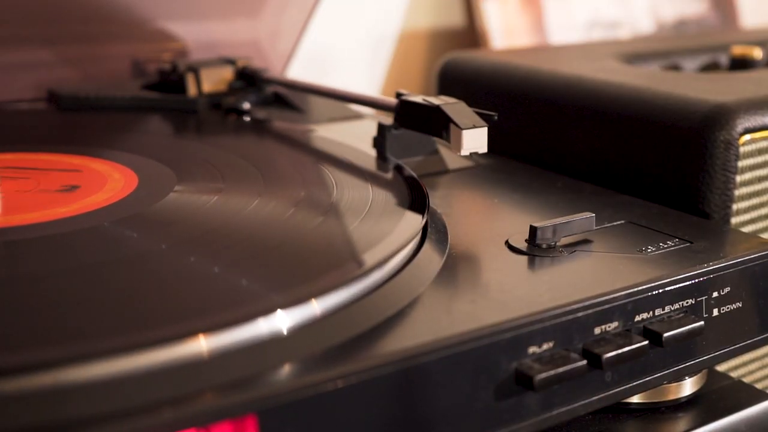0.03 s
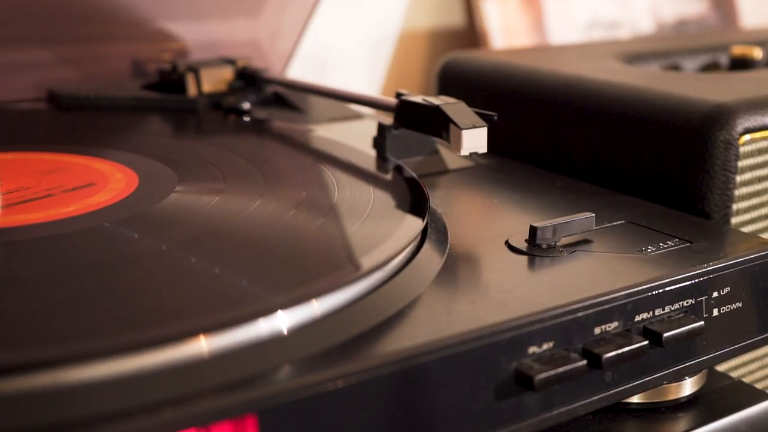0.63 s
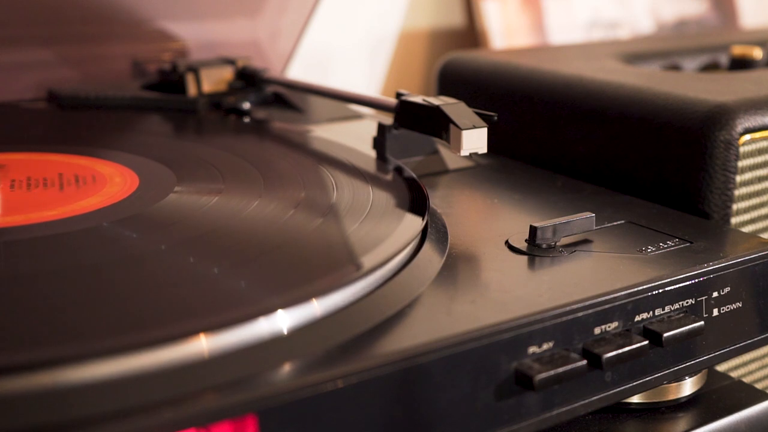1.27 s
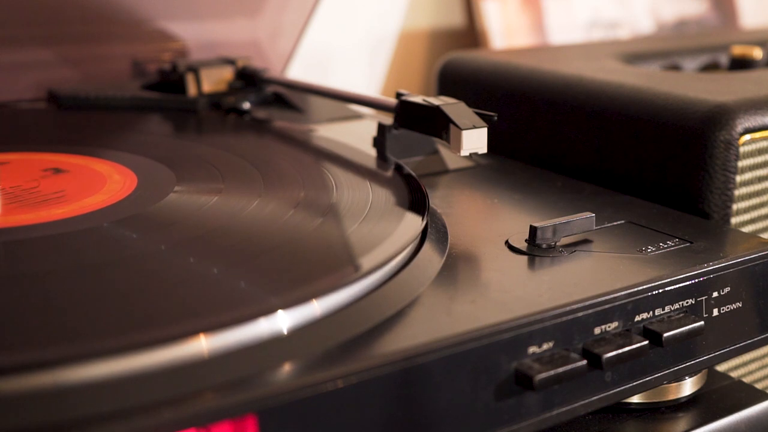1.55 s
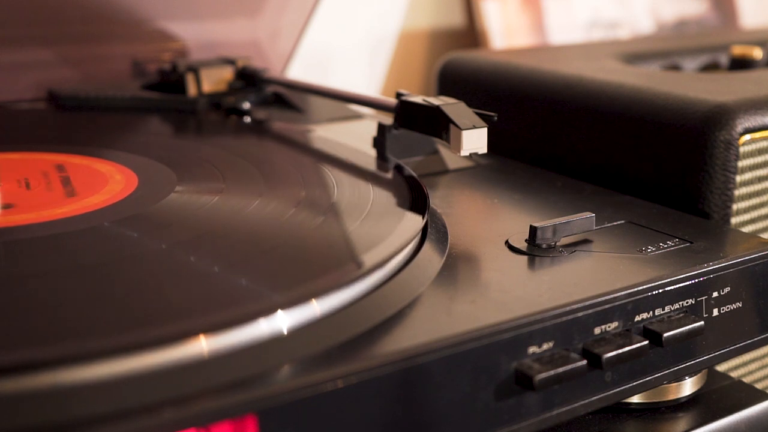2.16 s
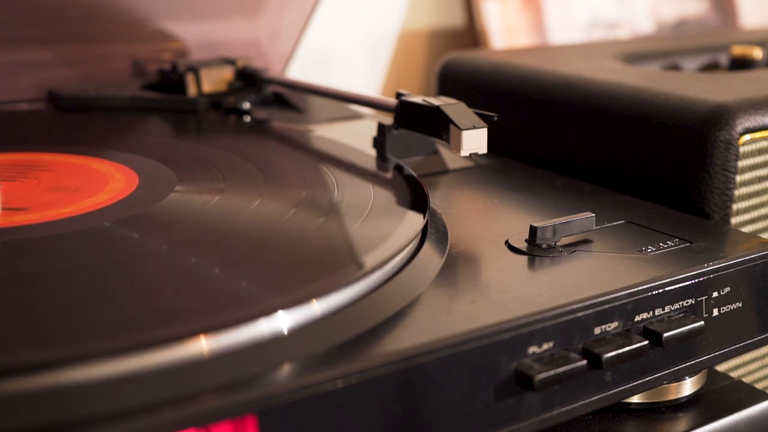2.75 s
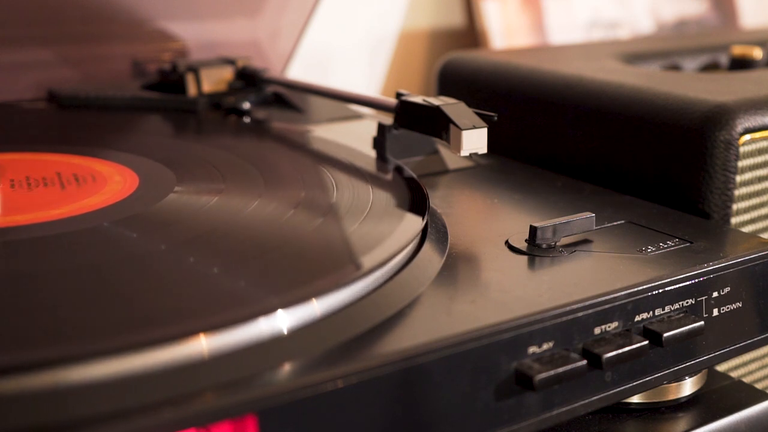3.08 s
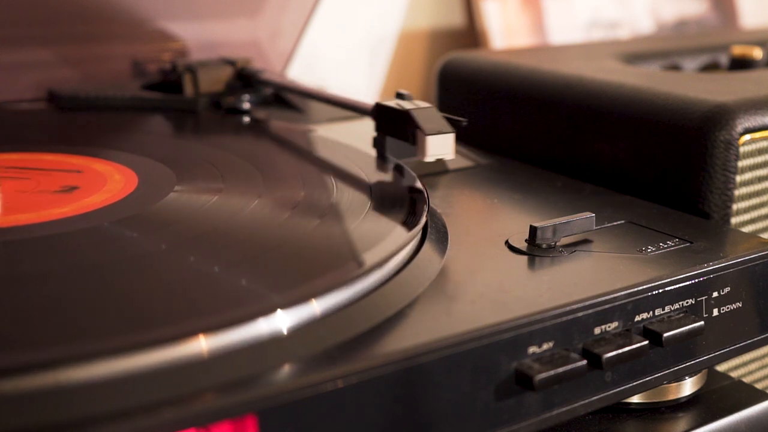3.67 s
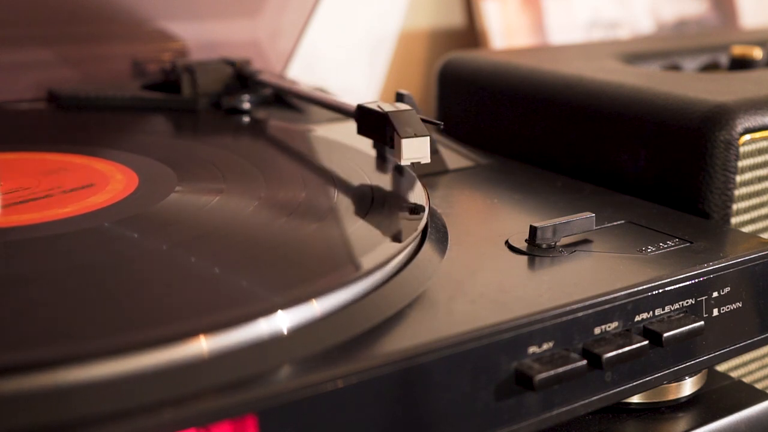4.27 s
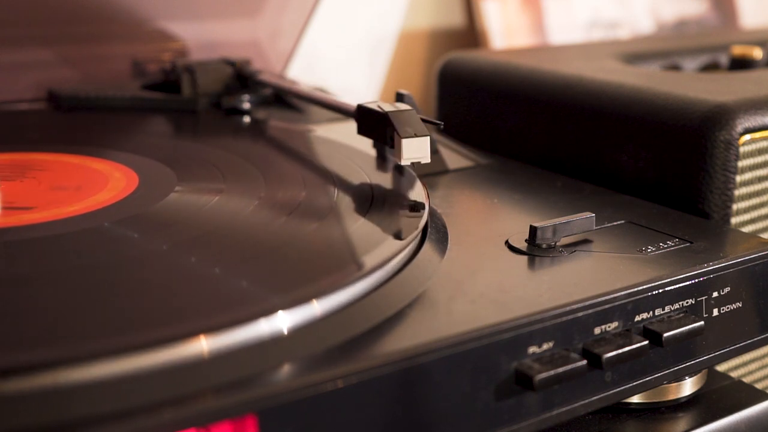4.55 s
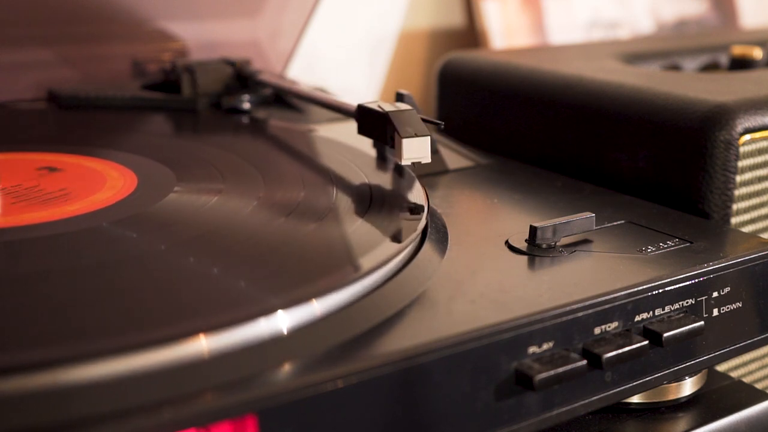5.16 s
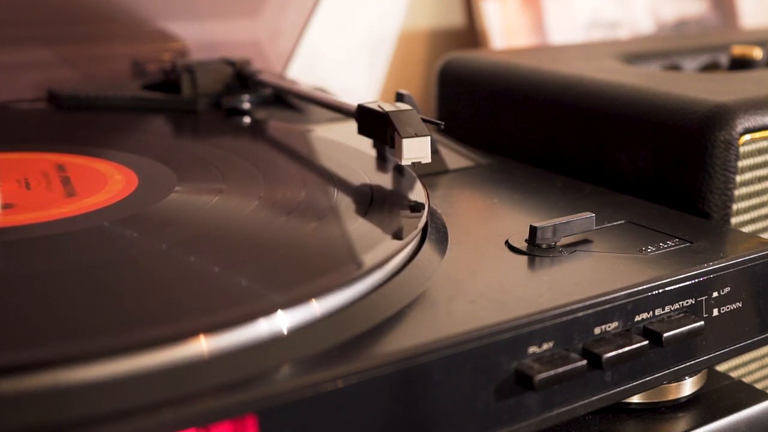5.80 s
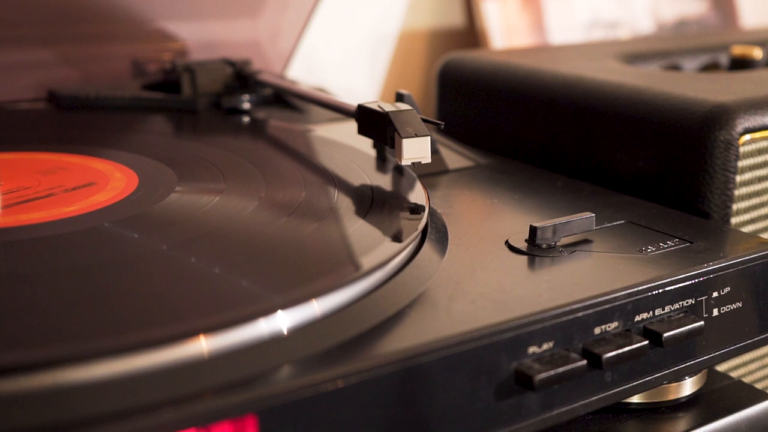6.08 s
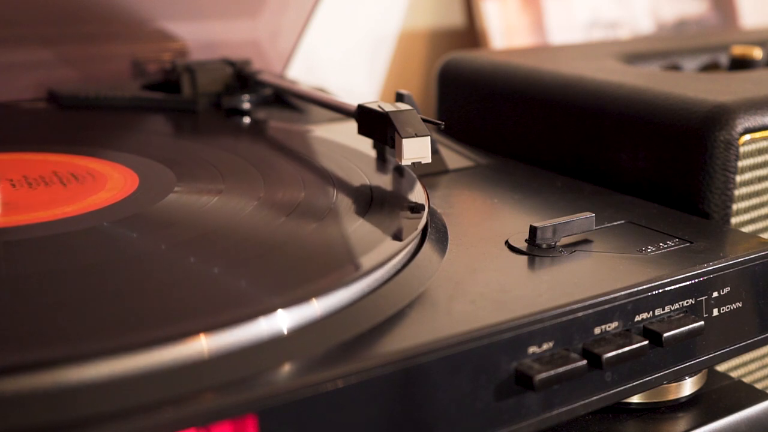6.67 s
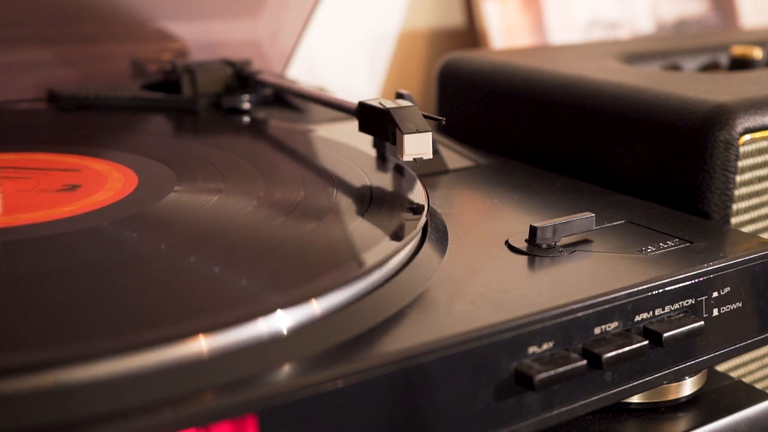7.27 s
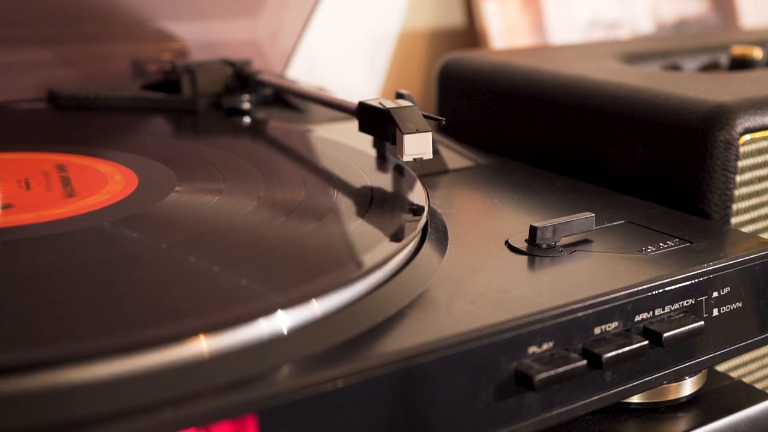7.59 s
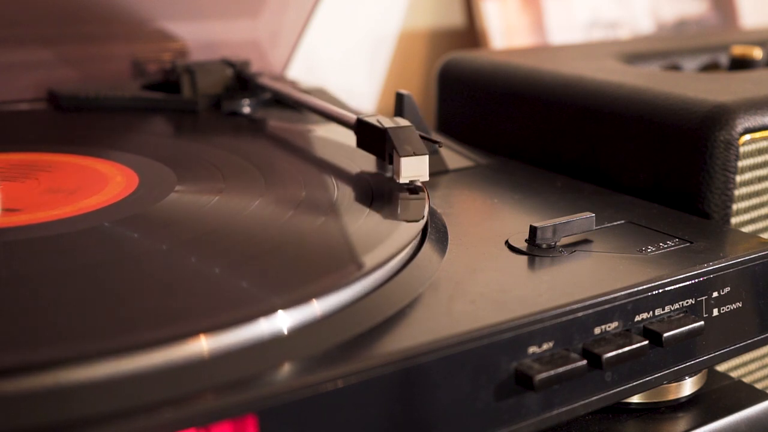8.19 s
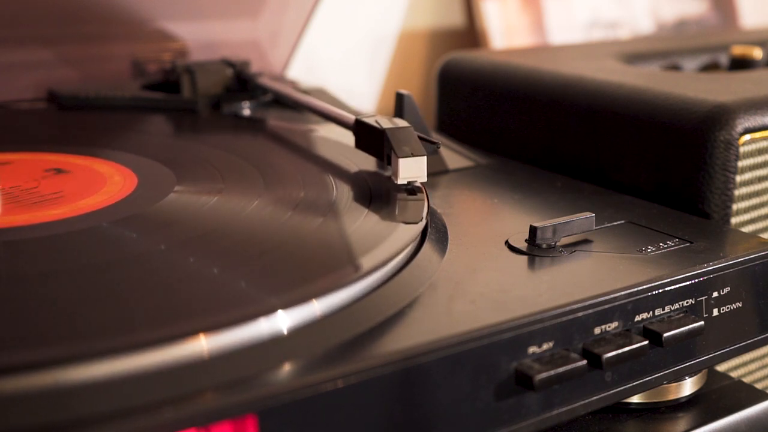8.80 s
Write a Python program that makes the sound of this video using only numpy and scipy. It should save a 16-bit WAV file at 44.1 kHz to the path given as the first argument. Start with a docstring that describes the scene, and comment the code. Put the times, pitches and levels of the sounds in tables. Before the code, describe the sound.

An automatic turntable starts up, heard close in a small room. A brief soft ratcheting gives way to faint gear ticks over a low whirr. A metal lever clatters and a latch snaps sharply. After a quieter stretch, dull knocks and plastic clicks follow, then the stylus lands with small pops and a low loudspeaker thump as the mechanism drops into place with a loud clunk.

```python
"""Automatic turntable starting

Heard from close by in a small room, each impact excites the damped modes of a part of the deck.
A pawl ratchets, a lever clatters and a latch snaps; the cam ticks and knocks as it swings the tonearm.
The stylus lands with pops and a low thump from the loudspeaker; the mechanism drops home with a clunk."""
import sys
import numpy as np
from scipy import signal
from scipy.fft import rfft, irfft
from scipy.io import wavfile

SR = 44100
rng = np.random.default_rng(int(sys.argv[2]) if len(sys.argv) > 2 else 0)


def master_out(mix):
    """Clip the mix to full scale and print it as 16-bit PCM to the path in sys.argv[1]."""
    frames = np.transpose(np.atleast_2d(mix))
    ceiling = np.clip(frames, -1, 1)
    pcm = np.round(ceiling * 32767).astype(np.int16)
    wavfile.write(sys.argv[1], SR, pcm)


N = 398663
HZ = np.fft.rfftfreq(N, 1 / SR)
AGE = np.arange(SR * 3 // 4) / SR  # time since a contact [s]

# Noise spectra of the steady background and the turning cam: (frequency [Hz], relative density [dB])
FLOOR_SPECTRUM = [(12, -27.5), (20, 4.5), (70, -3.5), (103, 1.5), (119, -12), (153, 3), (232, -12.5),
                  (298, -5), (452, -11), (581, -16.5), (649, -11), (1410, -20), (1580, -20.5), (3350, -26),
                  (15500, -32.5)]
WHIRR_SPECTRUM = [(100, -33), (230, -5.5), (340, 4), (450, 2.5), (600, -3), (850, -0.5), (1200, -9.5),
                  (1650, -10), (2400, -27), (6000, -42.5)]
# Whirr of the cam under its changing load: (time [s], level [dB])
WHIRR_LEVELS = [(0, -55), (.6, -64), (2.3, -63.5), (3.4, -58), (4.1, -63.5), (4.7, -60), (5.1, -67.5),
                (5.8, -60), (6.4, -67.5), (7.6, -57.5)]
# Resonances excited by friction: (frequency [Hz], width [Hz], gain [dB])
SLIDE_RESONANCES = [(485.2, 160, 0.5), (1054, 88, 3.5), (1550, 500, -3), (2830, 510, -6.5),
                    (3710, 580, -11.5)]
# Scrapes of the levers and runs of the pawl: (time [s], duration [s], initial level [dB])
SCRAPES = [(.132, .27, -50), (2.656, .1, -38), (2.905, 0.051, -57), (3.023, .07, -57)]
PAWL_RUNS = [(0.1399, .25, -50.5), (5.4107, .03, -53)]
# Impacts whose brightness follows their strength: (time [s], level [dB])
CAM_KNOCKS = [(6.586, -33.5), (6.679, -34), (6.704, -36.5), (6.8, -35), (6.977, -31.5), (7.157, -51),
              (7.167, -41.5), (7.204, -43)]
LEVER_HITS = [(2.6625, -32.5), (2.671, -30), (2.6855, -26.5), (2.717, -37), (2.738, -35), (2.7445, -37)]
# Impacts with a brightness of their own: (time [s], level [dB], brightness [dB])
GEAR_TICKS = [(0.079, -51, 0), (0.855, -49, -13), (1.419, -47, -4.5), (1.8135, -49, -15),
              (2.091, -50.5, -17), (2.12, -56.5, 11.5), (2.151, -51.5, -3), (2.1825, -49, 10.5),
              (2.643, -41.5, 4.5), (2.921, -52, 8), (3.057, -53.5, 12.5), (3.359, -53.5, -9),
              (3.493, -53, -18), (3.942, -41.5, 0), (7.425, -49.5, 3.5), (7.49, -49.5, -1),
              (7.597, -50, -7), (7.723, -49.5, -2.5)]
LINKAGE_CLICKS = [(6.8798, -27.5, 0), (7.237, -33.5, -5), (7.261, -35, -16.5)]
LATCH_HITS = [(3.1215, -19, 0.5)]
CLUNKS = [(8.1525, -17.5, 0)]
# Jolts of the stylus: (time [s], crack level [dB], cone level [dB])
POPS = [(8.059, -42, -42.5), (8.0747, -60, -46), (8.138, -35.5, -27), (8.6825, -48, -66)]
# Normal modes of each part: (frequency [Hz], relative level [dB], T60 [s])
DECK_MODES = [(378, -11.5, 0.16), (439.5, -4.5, 0.11), (578, -15.5, 0.15), (628, -12, 0.082),
              (688.6, -3, 0.071), (960, -13, 0.069), (1270, -12.5, .055)]
LINKAGE_MODES = [(366, -11.5, 0.13), (795, -8.5, 0.04), (863, -9, 0.011), (1015, -13, 0.074),
                 (1418, -8, 0.023), (2570, -12.5, 0.01)]
CONE_MODES = [(67.3, -4.5, 0.19), (150, -6.5, 0.077), (448, -3.5, 0.0048)]
LEVER_MODES = [(351, -8, 0.23), (464.1, -16, 0.1), (588, -14, 0.16), (883, -7.5, 0.033), (963, -11, 0.12),
               (1200, -16, .07), (1797, -18.5, 0.061), (2968, -9.5, 0.087), (3530, -18, 0.064),
               (4670, -10.5, 0.05), (6490, -13, 0.036), (7300, -19, 0.026), (8340, -16, 0.011)]
LATCH_MODES = [(360, -24.5, .3), (1008, -13.5, .1), (1378, -13, .15), (1550, -15.5, 0.16),
               (1774, -13.5, 0.034), (2030, -17, 0.027), (2155, -9.5, .02), (2430, -18.5, .05),
               (3100, -13.5, 0.069), (4060, -17.5, .02), (4180, -13, 0.027), (4890, -12, 0.043),
               (5447, -17, 0.031), (7167, -17.5, 0.013), (7850, -16.5, 0.014), (8313, -10.5, 0.013)]
CHASSIS_MODES = [(275, -13.5, 0.12), (310, -14.5, 0.11), (343.6, -16, 0.17), (480, -22.5, 0.18),
                 (629, -12.5, .12), (669, -4.5, 0.12), (715, -7.5, 0.15), (876, -13.5, .1),
                 (1014, -1.5, 0.13), (1110, -15, .1), (1200, -9, 0.055), (1224, -14.5, 0.058),
                 (1473, -6.5, 0.067), (2648, -15, .04)]
SPRING_MODES = [(153, -21, 0.24), (376, -19, 0.72), (512, -20, .8), (800, -33.5, 0.94), (988, -22.5, 0.2)]
# Spectra of the noisy part of each impact: (frequency [Hz], relative half-octave level [dB])
TICK_COLOUR = [(140, -23), (300, -5), (450, -8), (900, -6), (1500, -9.5), (3000, -18.5), (5600, -21.5),
               (8000, -18.5), (11000, -37), (16000, -35)]
KNOCK_COLOUR = [(140, -30.5), (300, -7), (450, -2), (750, -6.5), (1300, -13), (2000, -22.5), (4000, -32),
                (8000, -39), (16000, -55)]
CLICK_COLOUR = [(140, -22), (350, -10), (850, -6.5), (1400, -8), (2800, -13.5), (5600, -17), (8000, -24.5),
                (11000, -31), (16000, -47)]
POP_COLOUR = [(200, -22.5), (700, -20.5), (1500, -19), (2600, -9.5), (4200, -6.5), (6000, -13), (8500, -18),
              (12000, -38.5), (16000, -26)]
LEVER_COLOUR = [(140, -31), (350, -15.5), (850, -1.5), (1400, -14.5), (2100, -9), (3800, 3.5), (5600, -12),
                (8000, 1.5), (11000, -7.5), (16000, -36)]
LATCH_COLOUR = [(140, -42), (350, -30), (700, -25.5), (1100, -13.5), (2000, -5), (3000, -14.5), (5600, -9),
                (8000, -11), (11000, -18), (16000, -27.5)]
CLUNK_COLOUR = [(80, -22), (200, -21.5), (350, -10), (700, -12.5), (1200, -3.5), (2000, -12), (3000, -9.5),
                (5000, -21), (8000, -18), (11000, -31), (16000, -39)]
# Reflections from the table and walls: (delay [s], relative gain [ratio])
ECHOES = [(.0046, .14), (0.013, 0.11), (0.0152, .17), (.0235, .09)]
# Reverberation time: (frequency [Hz], T60 [s])
ROOM_T60 = [(100, 0.36), (400, .38), (1500, 0.27), (4000, 0.26), (8000, 0.22), (15000, 0.034)]
# Spectrum of the reverberant tail: (frequency [Hz], relative level [dB])
ROOM_COLOUR = [(600, 2), (1500, 2), (5000, -1.5), (8000, 0), (13000, 4)]
# Treble peak and dip of the microphone capsule: (frequency [Hz], gain [dB])
MICROPHONE = [(6500, -0.5), (8400, 5.5), (9200, 0), (10000, -8), (11500, 2)]

CAM_STOP_S, RUN_DOWN_DB_PER_S = 8.1, 28
FLOOR_DB, EDGE_HZ = -61, 15950


def amp(db):
    """Amplitude ratio of a level in decibels."""
    return 10 ** (np.asarray(db) / 20)


def unit(x):
    """Normalisation to rms 1."""
    return x / np.sqrt(np.mean(x ** 2) + 1e-20)


def unit_blow(x):
    """Normalisation to the energy of 20 ms at rms 1."""
    return x / np.sqrt(np.sum(x ** 2, -1, keepdims=True) / (SR / 50) + 1e-20)


def read(points, hz):
    """Interpolation on a log-frequency axis."""
    f, value = np.transpose(points)
    return np.interp(np.log(hz + 1), np.log(f + 1), value)


def shape(x, spectrum):
    """Linear filtering: each frequency is scaled by its gain in the table."""
    return irfft(rfft(x) * amp(read(spectrum, HZ)), N)


def add(mix, s, sound):
    """Superposition of a sound starting at time s."""
    part = mix[max(round(s * SR), 0):][:len(sound)]
    part += sound[:len(part)]


def flat_noise(size):
    """White noise: equal magnitudes with random phases."""
    return irfft(np.exp(2j * np.pi * rng.random(size // 2 + 1)), size)


def impulses(per_s):
    """Shot noise: impulses of random size at random times."""
    return rng.standard_normal(N) * (rng.random(N) < per_s / SR)


def half_octaves(x):
    """Filter bank: returns half-octave centre frequencies and band signals."""
    centres = 1000 * 2 ** (np.arange(-7, 9) / 2)
    offset = 2 * np.log2((np.fft.rfftfreq(len(x), 1 / SR) + 1) / centres[:, None])
    return centres, irfft(rfft(x) * np.cos(np.clip(offset, -1, 1) * np.pi / 2), len(x))


def resonance(hz, centre_hz, width_hz):
    """Frequency response of two identical resonators in series."""
    return 1 / (1 + 2j * (hz - centre_hz) / width_hz) ** 2


def swell(t, hz, rise, bloom_hz):
    """Onset transient: contact lasts `rise` s; modes below bloom_hz take longer to fill the body."""
    onset_s = rise * (1 + (bloom_hz / np.maximum(hz[:, None], 250)) ** 2)
    return 1 - np.exp(-(t / onset_s) ** 2)


def ring(modes, rise, bloom_hz=0, tone=((1, 0), (2, 0))):
    """Free vibration: after a contact, each mode is an exponentially damped sine."""
    hz, db, t60 = np.transpose(modes)
    swing = np.sin(2 * np.pi * (hz[:, None] * AGE + rng.random((len(hz), 1))))
    fade = np.exp(-np.log(1000) * AGE / t60[:, None]) * swell(AGE, hz, rise, bloom_hz)
    return amp(db + read(tone, hz)) @ unit_blow(swing * fade)


def rattle(colour, t60, damping, rise, bloom_hz=0, tone=((1, 0), (2, 0))):
    """Modal overlap: dense modes merge into noise; t60 [s] holds at 1 kHz and shortens above."""
    hz, bands = half_octaves(flat_noise(size=8192))
    t = AGE[:bands.shape[1]]
    band_t60 = t60 * (1000 / np.maximum(hz, 300)) ** damping
    fade = np.exp(-np.log(1000) * t / band_t60[:, None]) * swell(t, hz, rise, bloom_hz)
    return amp(read(colour, hz) + read(tone, hz)) @ unit_blow(bands * fade)


def strike(hits, modes, colour, modes_db, rattle_db, top_db, t60, damping, rise, bloom_hz):
    """Impact excitation of ring and rattle; brightness sets mids and treble, top_db treble alone."""
    out = np.zeros(N)
    for s, db, bright_db in hits:
        tone = [(900, 0), (2300, bright_db), (7500, bright_db + top_db)]
        add(out, s, amp(db + modes_db) * ring(modes, rise, bloom_hz, tone))
        add(out, s, amp(db + rattle_db) * rattle(colour, t60, damping, rise, bloom_hz, tone))
    lowest_hz = 245  # small panels radiate little below this
    return signal.sosfilt(signal.butter(4, lowest_hz, "highpass", fs=SR, output="sos"), out)


def harden(hits, neutral_db, slope):
    """Nonlinear contact: stronger blows are shorter, and so sound brighter."""
    return [(s, db, slope * (db - neutral_db)) for s, db in hits]


def rebound(hits, gap_s, loss_db, count):
    """Inelastic collision: a sprung part returns after each blow, sooner and softer every time."""
    bounces = []
    for s, db, bright_db in hits:
        for k in range(count + 1):
            bounces.append((s, db - k * loss_db, bright_db))
            s += gap_s * amp(-k * loss_db) * rng.uniform(.8, 1.2)
    return bounces


def room(x, wet_db, echo_db):
    """Convolution with the room response: direct sound, early reflections and a diffuse tail."""
    hz, bands = half_octaves(flat_noise(size=32768))
    t = np.arange(bands.shape[1]) / SR
    decay = np.exp(-np.log(1000) * t / read(ROOM_T60, hz)[:, None])
    tail = amp(read(ROOM_COLOUR, hz)) @ (bands * decay)
    tail *= 1 - np.exp(-(t / 0.002) ** 2)
    response = amp(wet_db) * tail / np.linalg.norm(tail)
    response[0] += 1
    for delay, gain in ECHOES:
        add(response, delay, np.array([gain * amp(echo_db)]))
    return signal.fftconvolve(x, response)[:N]


def background():
    """Stationary noise: a steady rumble and hiss under the whole scene."""
    return amp(FLOOR_DB) * unit(shape(rng.standard_normal(N), FLOOR_SPECTRUM))


def whirr():
    """Shot noise of tooth contacts follows the load on the cam and runs down once it stops."""
    teeth = room(impulses(per_s=350), wet_db=0, echo_db=-0.5)
    t = np.arange(N) / SR
    load_db = np.interp(t, *np.transpose(WHIRR_LEVELS))
    run_down_db = RUN_DOWN_DB_PER_S * np.maximum(t - CAM_STOP_S, 0)
    return unit(shape(teeth, WHIRR_SPECTRUM)) * amp(load_db - run_down_db)


def pivot():
    """Narrow-band resonance: the tonearm bearing sings faintly while the arm swings over."""
    size = 2 * SR
    bearing = resonance(np.fft.rfftfreq(size, 1 / SR), centre_hz=1600, width_hz=110)
    whine = unit(irfft(rfft(flat_noise(size)) * bearing))
    out = np.zeros(N)
    add(out, s=3.15, sound=amp(-76.5) * whine * signal.windows.tukey(size, .5))
    return out


def slide():
    """Stick-slip friction excites the levers' resonances; each scrape bites, eases and lets go."""
    attack_s, sag_db_per_s, release_s = .01, 34, .015
    body = sum(amp(db) * resonance(HZ, hz, width) for hz, width, db in SLIDE_RESONANCES)
    rubbed = unit(irfft(rfft(impulses(per_s=900)) * body, N))
    pressure = np.zeros(N)
    for s, length, db in SCRAPES:
        contact = np.clip(np.minimum(AGE / attack_s, 1 + (length - AGE) / release_s), 0, 1)
        add(pressure, s, contact * amp(db - sag_db_per_s * AGE))
    return room(rubbed * pressure, wet_db=-10.5, echo_db=0)


def gears():
    """Impulsive excitation: gear slips ring the deck, a few clear ticks among faint random ones."""
    slips_per_s, slip_db, spread_db, bright_db = 6, -61.5, 2, -14
    draws = rng.random((int(slips_per_s * CAM_STOP_S), 2))
    slips = [(when * CAM_STOP_S, slip_db + spread_db * (2 * size - 1), bright_db)
             for when, size in draws]
    dry = strike(GEAR_TICKS + slips, DECK_MODES, TICK_COLOUR, modes_db=-9, rattle_db=-2, top_db=-15,
                 t60=0.05, damping=.45, rise=0.0017, bloom_hz=892.4)
    return room(dry, wet_db=-10.5, echo_db=-1)


def pawl():
    """Periodic impacts: the pawl drops off evenly spaced teeth, each tick softer than the last."""
    tooth_s, fade_db, bright_db = .0715, 3, 8
    drops = [(s + k * tooth_s, db - k * fade_db, bright_db)
             for s, length, db in PAWL_RUNS for k in range(int(length / tooth_s) + 1)]
    dry = strike(drops, DECK_MODES, TICK_COLOUR, modes_db=-4, rattle_db=-2.5, top_db=0,
                 t60=0.073, damping=0.39, rise=0.0013, bloom_hz=890)
    return room(dry, wet_db=-5, echo_db=1)


def cam():
    """Soft contact: dull bumps of the cam excite mainly the low, hollow modes of the deck."""
    hits = harden(CAM_KNOCKS, neutral_db=-31, slope=0.9)
    dry = strike(hits, DECK_MODES, KNOCK_COLOUR, modes_db=-2.5, rattle_db=-4, top_db=-10,
                 t60=0.087, damping=1.0, rise=0.00051, bloom_hz=1190)
    return room(dry, wet_db=-14, echo_db=-12)


def linkage():
    """Heavy damping: the plastic arm linkage clicks briefly as it meets its stop and lets go."""
    dry = strike(LINKAGE_CLICKS, LINKAGE_MODES, CLICK_COLOUR, modes_db=-0.5, rattle_db=-2.5, top_db=.5,
                 t60=0.045, damping=0.48, rise=0.00041, bloom_hz=700)
    return room(dry, wet_db=-12.5, echo_db=2.5)


def stylus():
    """Transduction: each stylus jolt becomes a loudspeaker crack and a low swing of its cone."""
    cracks, cone = np.zeros((2, N))
    for s, crack_db, cone_db in POPS:
        add(cracks, s, amp(crack_db) * rattle(POP_COLOUR, t60=0.0032, damping=.1, rise=0.00027))
        add(cone, s, amp(cone_db) * ring(CONE_MODES, rise=0.00039))
    return room(cracks, wet_db=-7.5, echo_db=-2.5) + room(cone, wet_db=-6.5, echo_db=-3.5)


def lever():
    """Restitution: a sprung metal lever clatters into the cam, rebounding once from each blow."""
    blows = harden(LEVER_HITS, neutral_db=-23, slope=0.43)
    hits = rebound(blows, gap_s=.014, loss_db=11.5, count=1)
    dry = strike(hits, LEVER_MODES, LEVER_COLOUR, modes_db=1, rattle_db=-6.5, top_db=-1,
                 t60=0.073, damping=0.29, rise=0.0011, bloom_hz=910)
    return room(dry, wet_db=-16, echo_db=-20)


def latch():
    """Hard contact: one snap excites the modes of the latch far into the treble."""
    dry = strike(LATCH_HITS, LATCH_MODES, LATCH_COLOUR, modes_db=-2, rattle_db=-1, top_db=0,
                 t60=0.052, damping=0.23, rise=0.0013, bloom_hz=697.4)
    return room(dry, wet_db=-14.5, echo_db=-7.5)


def clunk():
    """Free decay: the mechanism drops home, the chassis booms and lightly damped springs ring on."""
    dry = strike(CLUNKS, CHASSIS_MODES, CLUNK_COLOUR, modes_db=-1.5, rattle_db=-2, top_db=-0.5,
                 t60=0.1, damping=0.4, rise=0.0013, bloom_hz=700)
    for s, db, _ in CLUNKS:
        add(dry, s, amp(db) * ring(SPRING_MODES, rise=0.0069))
    return room(dry, wet_db=-14.5, echo_db=-5.5)


def scene():
    """Superposition in mono: the start cycle, coloured by the microphone, over a steady background noise and
    whirr."""
    deck = gears() + pawl() + slide() + lever() + latch() + cam() + linkage()
    deck = deck + clunk() + stylus() + pivot()
    return (shape(deck, MICROPHONE) + background() + whirr())[None]


def record(dry):
    """Band limiting: a linear-phase low-pass filter cuts off at EDGE_HZ."""
    lowpass = signal.firwin(401, EDGE_HZ, window=("kaiser", 9), fs=SR)
    return signal.oaconvolve(dry, lowpass[None], "same")


dry = scene()
out = record(dry)
master_out(out)
```